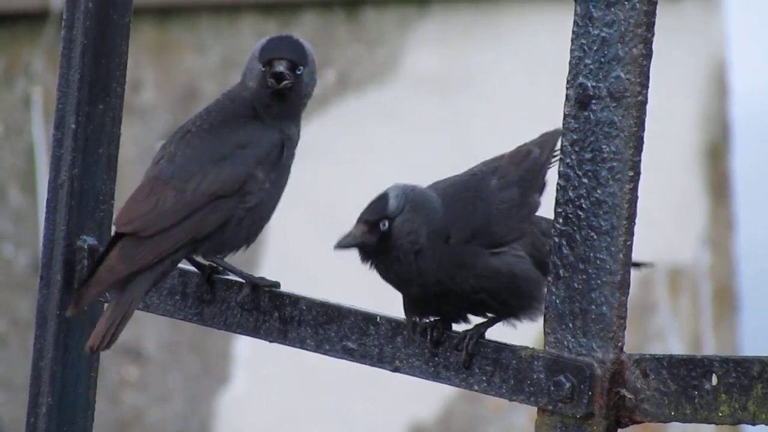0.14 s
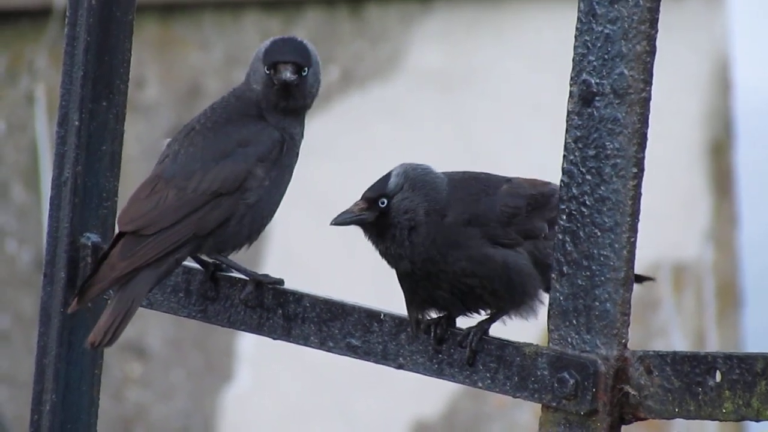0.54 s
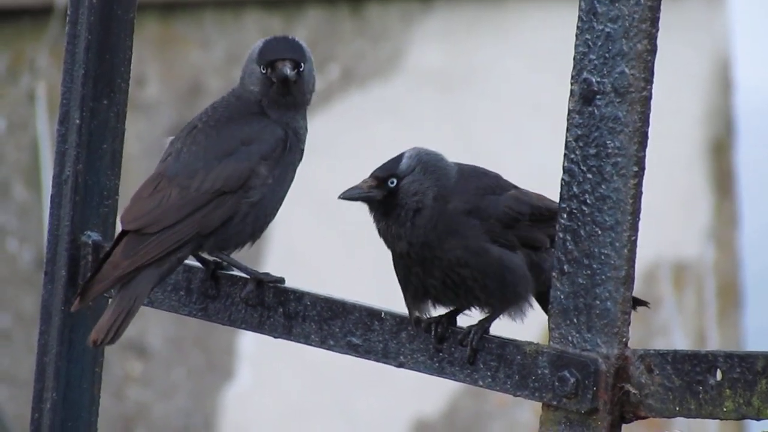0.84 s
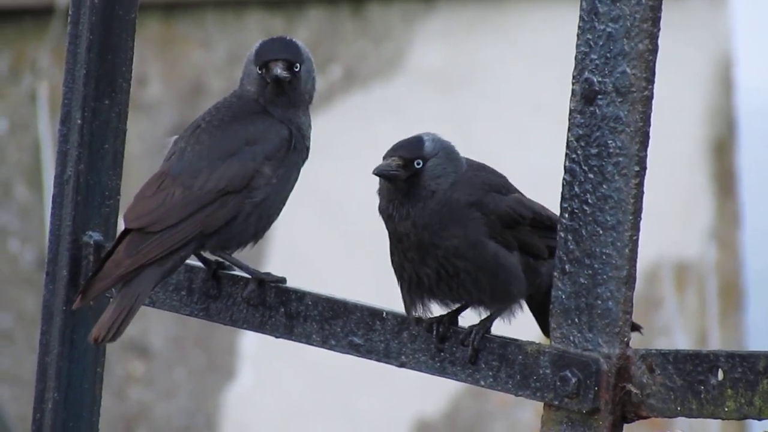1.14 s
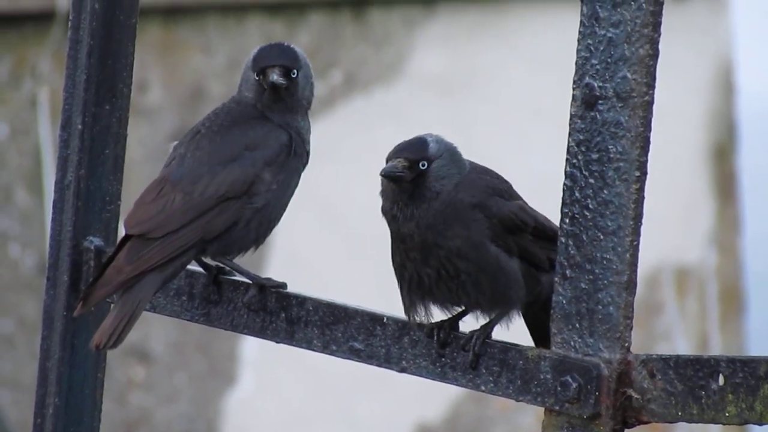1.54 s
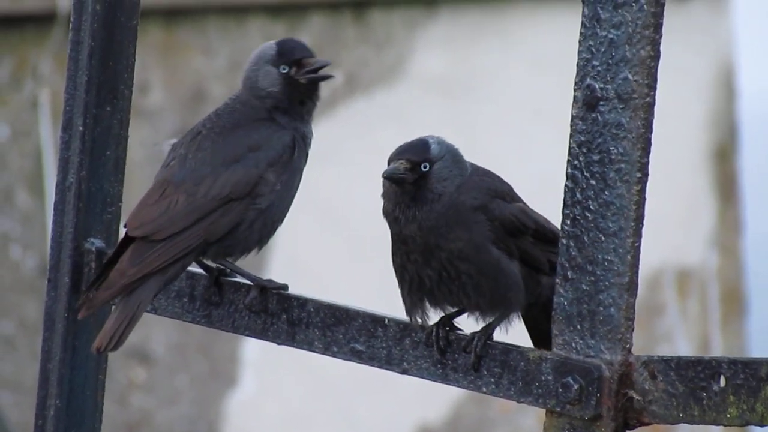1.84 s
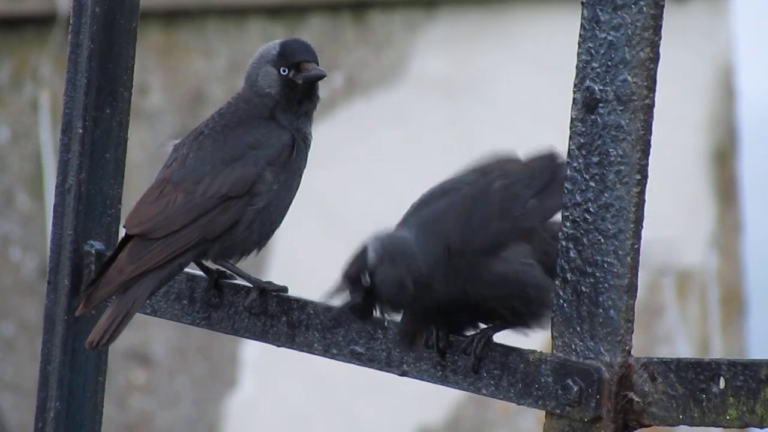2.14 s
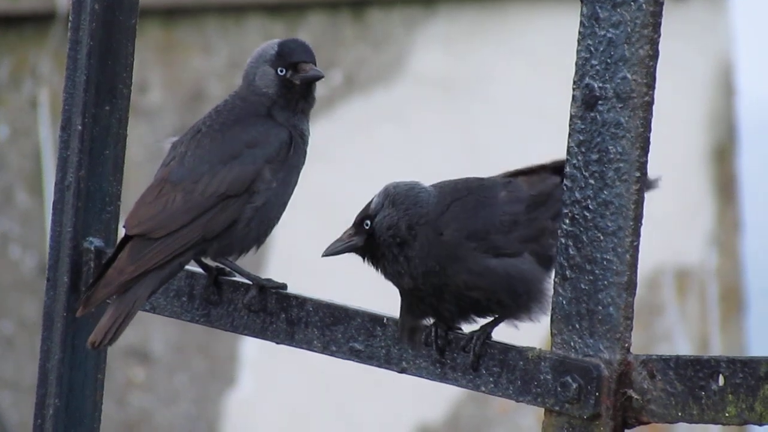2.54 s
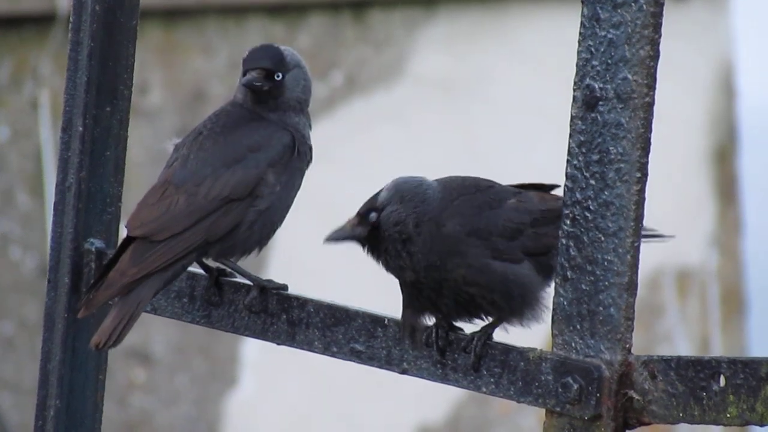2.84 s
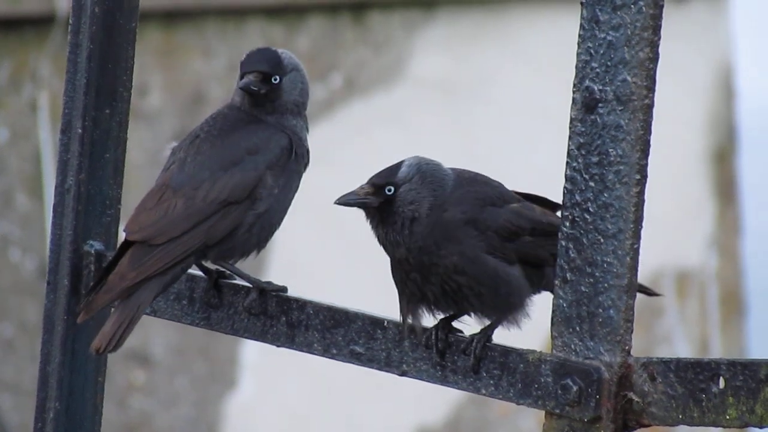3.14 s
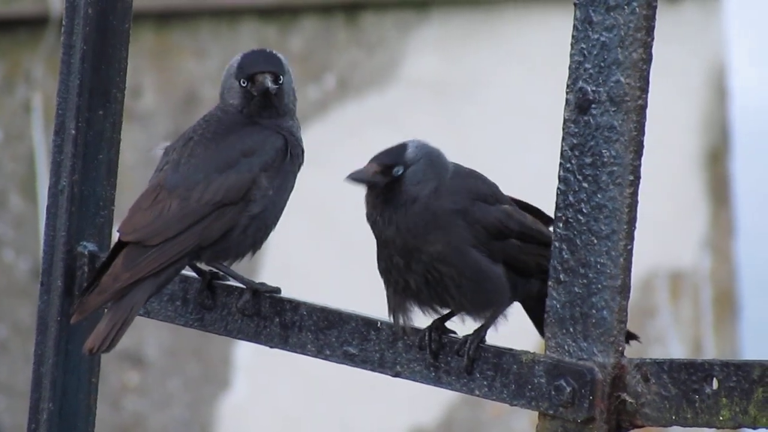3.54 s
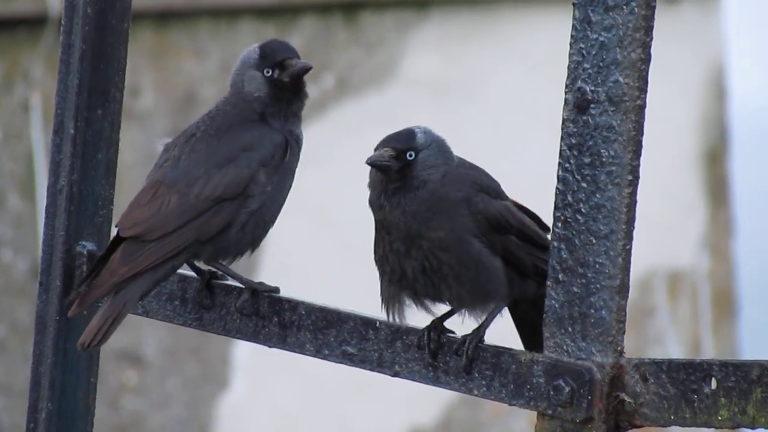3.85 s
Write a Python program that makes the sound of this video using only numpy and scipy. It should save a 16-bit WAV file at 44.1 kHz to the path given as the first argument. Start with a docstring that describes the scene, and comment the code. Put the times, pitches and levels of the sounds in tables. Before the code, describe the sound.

A close jackdaw is caught mid-chack at 0 s, then gives a harsh falling caw at 0.2 s. After a gap, a caw at 1.95 s is followed by a clear chack at 2.15; a final caw comes at 3.7. Walls return short echoes and a ringing tail. A faint gull yelps until 1.8, sparrows chirp between 0.5 and 3.3, a far jackdaw calls at 2.75. Low town noise; wind thumps the microphone, strongest at the start.

```python
"""Jackdaws among buildings: long falling caws and short clear chacks, as harmonic series through throat resonances.
Yard walls return them as discrete echoes and a decaying comb-filter tail; a third jackdaw calls far off.
A far gull yelps in frequency-modulated arches, sparrows chirp in gliding tones, and noise bands rasp and murmur.
Band-filtered noise makes the town and its hums; low-passed noise makes gusts thump the two microphone ports."""
import sys
import numpy as np
from scipy import signal
from scipy.fft import rfft, irfft, next_fast_len
from scipy.io import wavfile

SR = 44100
rng = np.random.default_rng(int(sys.argv[2]) if len(sys.argv) > 2 else 0)


def to_wav(s):
    """Save 16-bit WAV."""
    ch = np.atleast_2d(s).T  # columns
    pcm = np.round(np.clip(ch, -1, 1) * 32767)  # PCM
    wavfile.write(sys.argv[1], SR, pcm.astype(np.int16))


N = 176400
T = np.arange(N) / SR
PAD = next_fast_len(N + 2 * SR)
HZ = np.maximum(np.arange(PAD // 2 + 1) * SR / PAD, 1)
CUTOFF_HZ = 15800   # no jackdaw harmonic sounds above this


def amp(db):
    """Level to amplitude: 20 dB is a factor of ten."""
    return 10 ** (np.asarray(db) / 20)


def rms_one(x):
    """Normalisation to unit root-mean-square."""
    return x / np.sqrt(np.mean(x ** 2) + 1e-20)


def at_hz(points, hz):
    """Linear interpolation on a logarithmic frequency axis."""
    f, v = np.transpose(points)
    return np.interp(np.log(hz), np.log(np.maximum(f, 1)), v)


def drift(rate, size=N):
    """Slow random modulation of unit rms: white noise through a double real pole at `rate` Hz."""
    r = np.exp(-2 * np.pi * rate / SR)
    noise = rng.standard_normal(size + SR // 2)
    settled = signal.lfilter([1], [1, -2 * r, r * r], noise)[SR // 2:]
    return rms_one(settled)


def shaped(x, gain):
    """Linear filtering: the spectrum is multiplied by a frequency response."""
    return irfft(rfft(x, PAD) * gain, PAD)[..., :N]


def bump(start, length, rise):
    """Sine-squared envelope that peaks at the fraction `rise` of its span."""
    u = (T - start) / length
    ramp = np.clip(np.minimum(u / rise, (1 - u) / (1 - rise)), 0, 1)
    return np.sin(np.pi / 2 * ramp) ** 2


def sine_phase(hz):
    """Phase is the time integral of frequency."""
    return 2 * np.pi * np.cumsum(hz) / SR


JITTER = .002                # rms share of pitch
PHASE_SCATTER_RAD = 3.5      # range of starting phases
FLUTTER_DB = 3.2             # each harmonic wavers on its own; in full from the fifth up
BEAK_DB, BEAK_WIDTH_HZ = 8, 250   # lift of the strongest harmonic
NOTCH_HZ, NOTCH_WIDTH_HZ, NOTCH_DB = 3580, 290, -16   # side branch of the throat
FIFTH_DB = -7                # fifth harmonic before the break
BREAK_ROUGH, BREAK_ROUGH_S = .25, .015   # extra roughness at the break, and its decay time
LATE_FOURTH_DB, LATE_AFTER_S = 6, .035   # the fourth harmonic grows as the pitch sags


def rough_harmonic(k, phase, rough):
    """Narrow-band modulation: part of a harmonic's steady carrier power goes to noise sidebands."""
    size = len(phase)
    smooth = signal.butter(2, 220, fs=SR, output="sos")
    shake = signal.sosfilt(smooth, rng.standard_normal((2, size + 500)))[:, 500:]
    shake = shake / shake.std()
    share = np.clip(rough * (.2 + k / 5), 0, .95)   # higher harmonics are noisier
    envelope = np.sqrt(1 - share) + np.sqrt(share / 2) * (shake[0] + 1j * shake[1])
    wave = envelope * np.exp(1j * (k * phase + rng.uniform(0, PHASE_SCATTER_RAD)))
    flutter_db = FLUTTER_DB * min(k / 5, 1) * (drift(25, size=size) - .2)
    return (wave * amp(flutter_db)).imag


def jackdaw_call(rows, throat, rough_start, rough_end, break_s, third_db, fourth_db):
    """Source-filter voice: a jittered harmonic series, rougher late on, weighted by the throat's resonances."""
    s, *columns = np.transpose(rows)
    i = np.arange(int(s[0] * SR), int(s[-1] * SR))
    t = i / SR
    hz, db, treble_db = [np.interp(t, s, c) for c in columns]
    hz = hz * (1 + JITTER * drift(128, size=len(i)))
    phase = sine_phase(hz)

    broken = np.clip((t - break_s) / .006, 0, 1)   # 0 before the break, 1 after
    since = np.clip(t - break_s, 0, 1)
    rough = rough_start + (rough_end - rough_start) * np.linspace(0, 1, len(i)) ** 3
    rough = rough + BREAK_ROUGH * broken * np.exp(-since / BREAK_ROUGH_S)
    before_break_db = {3: third_db, 4: fourth_db, 5: FIFTH_DB}
    late_db = LATE_FOURTH_DB * np.clip(since / LATE_AFTER_S - 1, 0, 1)
    beak_hz = hz * (2 + broken)   # strongest harmonic: second, then third

    parts, powers = np.zeros((2, len(i))), np.zeros((2, len(i)))   # low band, high band
    for k in range(1, 45):
        harmonic_hz = k * hz
        gain_db = at_hz(throat, harmonic_hz)
        gain_db = gain_db + NOTCH_DB * np.exp(-((harmonic_hz - NOTCH_HZ) / NOTCH_WIDTH_HZ) ** 2)
        gain_db = gain_db + BEAK_DB * np.exp(-((harmonic_hz - beak_hz) / BEAK_WIDTH_HZ) ** 2)
        gain_db = gain_db + before_break_db.get(k, 0) * (1 - broken) + (k == 4) * late_db
        gain = amp(gain_db) * (harmonic_hz < CUTOFF_HZ)
        high = np.clip((harmonic_hz - 3600) / 800, 0, 1)   # crossover around 4 kHz
        bands = np.array([1 - high, high])
        parts += gain * rough_harmonic(k, phase, rough) * bands
        powers += gain ** 2 / 2 * bands ** 2

    # each band is brought to its share of the power
    top = np.clip(amp(treble_db) ** 2, 0, .95)
    voice = np.sum(parts * np.sqrt([1 - top, top] / powers), axis=0)
    attack = np.clip((t - s[0]) / .0015 + (s[0] == 0), 0, 1)   # a call at time zero starts at once
    release = np.clip((s[-1] - t) / .008, 0, 1)
    out = np.zeros(N)
    out[i] = amp(db) * attack * release * voice
    return out


# long falling calls, one table each: [t/s, pitch f/Hz, level/dB, treble above about 4 kHz re level/dB]
CAW_CONTOURS = [
    [(0.218, 583, -45, -12), (0.227, 720, -28, -5), (0.236, 728.6, -19, -5.5), (0.25, 725.4, -15.5, -6),
     (0.256, 697.7, -14, -5), (0.28, 556.7, -21, -1), (0.302, 503, -23.5, -5.5), (0.334, 453.5, -25, -7),
     (0.364, 396, -31, -2), (0.376, 393, -30, -4), (0.4, 364, -47, -11)],
    [(1.939, 587, -30, -11), (1.947, 712, -26, 10), (1.951, 771, -21.5, -3), (1.966, 760.5, -16.5, -4),
     (1.971, 762, -15, -0.5), (1.989, 621.4, -16, -2), (2.019, 498.5, -22.5, -2), (2.063, 434.7, -27, -4.5),
     (2.087, 420.6, -25, -3.5), (2.11, 435, -48, -19)],
    [(3.706, 487, -37, -23), (3.712, 642, -34, -8), (3.718, 812.5, -23, -5), (3.735, 756, -18.5, -1),
     (3.74, 752.6, -14, -2), (3.76, 569, -17.5, -2.5), (3.78, 506.7, -20.5, -2), (3.8, 458.4, -26, -6.5),
     (3.824, 437, -25.5, -0.5), (3.876, 325.6, -33.5, -6), (3.89, 315, -50, -16)],
]
# throat response in a caw: [f/Hz, relative level/dB]
CAW_RESONANCES = [(290, -36), (500, -23.5), (863, -26), (1390, -2), (1890, 0), (2260, 3.5), (2650, -1),
                  (3080, -11.5), (3390, -3), (3640, 0), (4010, -7), (4680, -13), (5020, -6.5), (5310, 1),
                  (6190, 0), (7850, -7.5), (9160, -7), (9820, -5), (11000, -15.5), (12800, -12.5),
                  (14100, -43)]
# voice breaks, where the strongest harmonic jumps from second to third:
# [t/s, third harmonic before it level/dB, fourth harmonic before it level/dB]
CAW_BREAKS = [(.247, -2, 0), (1.968, -12, 7), (3.738, -10, 2)]


def caws():
    """Register break: the pitch falls and the strongest harmonic moves up one order."""
    return sum(jackdaw_call(rows, CAW_RESONANCES, .05, .3, *break_row)
               for rows, break_row in zip(CAW_CONTOURS, CAW_BREAKS))


# short clear calls, one table each: [t/s, pitch f/Hz, level/dB, treble above about 4 kHz re level/dB]
CHACK_CONTOURS = [
    [(0.0, 1080, -15, -5.5), (0.016, 930, -22, -12.5), (0.032, 826, -28, -5), (0.048, 710, -40, -24),
     (0.055, 670, -34, -17)],
    [(2.157, 1161, -20, -6.5), (2.175, 1097, -16, -5.5), (2.203, 855, -27, -5.5), (2.225, 700, -36, -27)],
]
# throat response in a chack: [f/Hz, relative level/dB]
CHACK_RESONANCES = [(350, -60), (600, -28), (928, -6), (1360, -11), (2250, 0), (3350, -10), (4910, -10.5),
                    (6560, -4), (7690, -8), (8550, -20), (10300, -9.5), (12900, -34), (14100, -44)]


def chacks():
    """Short harmonic calls of rapidly falling pitch, without a register break."""
    return sum(jackdaw_call(rows, CHACK_RESONANCES, .2, .45, np.inf, 0, 0) for rows in CHACK_CONTOURS)


# interaural-type differences between the ports: [f/Hz, left minus right level/dB]
PORT_LEVEL = [(60, -5), (91, -3), (140, -6), (210, -6), (320, 7), (480, -1.5), (740, -2), (1120, 0.5),
              (1700, 0.5), (2570, 4.5), (3910, 1.5), (5930, 5.5), (9010, -4.5), (13700, 5.5)]
# [f/Hz, phase by which the left leads/rad]
PORT_PHASE = [(0, 0), (2410, .3), (2760, -1), (3700, .5), (4310, -.6), (4650, .2), (6120, -.2), (7150, .3),
              (7580, 4.2), (8010, 4.2), (9220, 6.5), (13900, 6.2)]


def at_ports(x):
    """Stereo reception: level and phase differences, split evenly between the two ports."""
    sign = np.array([[.5], [-.5]])
    phase = np.interp(HZ, *np.transpose(PORT_PHASE))
    return shaped(x, amp(sign * at_hz(PORT_LEVEL, HZ)) * np.exp(1j * sign * phase))


# decay of the tail by 60 dB: [f/Hz, decay time t/s]
YARD_DECAY = [(500, 3), (1300, 0.28), (2250, 1.17), (2800, 2.6), (4000, 1.35), (6000, 0.74), (12000, 0.26)]
# near and far walls: [delay t/s, level/dB, low-pass f/Hz]
WALL_ECHOES = [(.012, -15, 12000), (.027, -18, 9000), (.21, -26, 2600)]
# a row of echoes in one band: [delay t/s]
RING_DELAYS = (.04, .07, .11, .14, .17, .2)
# crossfeed of the response between sides: [f/Hz, amplitude share added from the other side]
YARD_CROSSFEED = [(1000, 0.21), (3000, 0.43), (8000, 0.025)]
YARD_DB, YARD_TILT_DB = -28, -1.5   # tail gain at 2 kHz, tilt per octave
RING_HZ, RING_WIDTH_HZ, RING_DB = 3080, 300, -19


def yard(x):
    """Reverberation: discrete wall reflections, and sixteen parallel comb filters a side for the tail."""
    def delay(s):
        return np.exp(-2j * np.pi * HZ * s)

    t60 = at_hz(YARD_DECAY, HZ)
    ring_band = amp(RING_DB) / (1 + (2 * (HZ - RING_HZ) / RING_WIDTH_HZ) ** 4)
    tail_gain = amp(YARD_DB + YARD_TILT_DB * np.log2(HZ / 2000))
    sides = []
    for side in range(2):
        tail = 0
        for k, d in enumerate(rng.uniform(0.022, .09, 16)):
            loop_gain = amp(-60 * d / t60)
            tail = tail + (-1) ** k * delay(d) / (1 - loop_gain * delay(d))
        # walls reach the right side 0.71 ms later
        walls = sum(amp(db) * delay(s + 0.00071 * side) / (1 + (HZ / hz) ** 4) for s, db, hz in WALL_ECHOES)
        ring = ring_band * sum(delay(s * rng.uniform(.95, 1.05)) for s in RING_DELAYS)
        sides.append(tail_gain * tail + walls + ring)
    sides = np.array(sides)
    return shaped(x, sides + np.clip(at_hz(YARD_CROSSFEED, HZ), 0, 1) * sides[::-1])


# far gull: [start t/s, top pitch f/Hz, relative level/dB]
GULL_YELPS = [(-.05, 1384, -29.5), (0.218, 1386, -34), (.495, 1395, -33), (0.764, 1407, -36.5),
              (1.04, 1388, -37.5), (1.325, 1390, -37), (1.64, 1363, -37)]
YELP_S, YELP_TOP_AT = .135, .4   # length, and the share of it where pitch peaks
YELP_RISE_BEND, YELP_FALL_BEND = .8, .42   # curvature of the pitch arch
YELP_DIP_DB, YELP_OVERTONE_DB = -9, -18


def gull():
    """Frequency modulation: arched tones with a second harmonic, weak at the top and loudest on the way down."""
    out = 0
    for s, top_hz, db in GULL_YELPS:
        u = (T - s) / YELP_S
        bend = np.where(u < YELP_TOP_AT, YELP_RISE_BEND, YELP_FALL_BEND)
        phase = sine_phase(top_hz * (1 - bend * np.clip(u - YELP_TOP_AT, -1, 1) ** 2))
        early = bump(s, 0.41 * YELP_S, rise=0.17) + .4 * bump(s, 0.7 * YELP_S, rise=0.7)
        late = bump(s + 0.46 * YELP_S, 0.56 * YELP_S, rise=0.75) ** .6
        swell = amp(YELP_DIP_DB) * early + late
        over = amp(YELP_OVERTONE_DB) * bump(s, YELP_S, rise=0.42) ** .5 * amp(5 * drift(50))
        out = out + amp(db) * (swell * np.sin(phase) + over * np.sin(2 * phase))
    return out * amp(2.0 * drift(38))


# sparrows: [start t/s, length t/s, start f/Hz, middle f/Hz, end f/Hz, relative level/dB]
SPARROW_CHIRPS = [(.545, 0.079, 4950, 4800, 4500, -52), (.59, 0.047, 4700, 5230, 5130, -50),
                  (0.702, 0.016, 4400, 4610, 4680, -51), (2.835, 0.037, 4250, 4200, 4200, -62),
                  (1.235, 0.051, 4400, 5310, 4500, -51), (1.357, 0.035, 4180, 4760, 5200, -55),
                  (2.478, 0.047, 4700, 5360, 4670, -49), (2.556, 0.11, 5100, 5160, 5150, -60),
                  (2.716, 0.042, 4000, 4140, 4200, -53), (2.927, 0.047, 4250, 4170, 4120, -57),
                  (2.983, 0.044, 4000, 4040, 4000, -52), (3.133, 0.05, 4800, 5180, 4270, -48.5),
                  (3.17, 0.022, 5200, 5000, 5050, -54), (3.222, .035, 5250, 5200, 5100, -58),
                  (3.262, 0.042, 5200, 5160, 5250, -59.5), (3.247, .03, 4330, 4380, 4260, -58)]
CHIRP_BLUR_HZ = 42   # rms wander of the pitch


def sparrows():
    """Gliding pure tones: frequency follows a parabola through three points, blurred by random modulation."""
    out = 0
    for s, length, hz0, hz1, hz2, db in SPARROW_CHIRPS:
        parabola = np.polyfit([0, .5, 1], [hz0, hz1, hz2], 2)
        hz = np.polyval(parabola, np.clip((T - s) / length, 0, 1))
        tone = np.sin(sine_phase(hz + CHIRP_BLUR_HZ * drift(117.0)))
        out = out + amp(db) * bump(s, length, rise=0.31) ** .5 * tone
    return out * amp(4 * drift(90))


# a third jackdaw far off: start t/s, length t/s, start f/Hz, end f/Hz
FAR_CALL = (2.757, .07, 1480, 1370)
# its first four harmonics: relative level/dB
FAR_HARMONICS = [-46.5, -54, -56, -53]


def far_jackdaw():
    """Harmonic synthesis: four partials of a falling pitch, the higher ones more sharply peaked in time."""
    s, length, hz0, hz1 = FAR_CALL
    phase = sine_phase(np.interp(T, [s, s + length], [hz0, hz1]))
    envelope = bump(s, length, rise=.15)
    return sum(amp(db) * envelope ** (k / 2) * np.sin(k * phase) for k, db in enumerate(FAR_HARMONICS, 1))


# a raspy twitter and the murmur of far gulls: [start t/s, length t/s, centre f/Hz, width f/Hz, relative level/dB]
RASP_BANDS = [(0.541, 0.25, 4670, 940, -53), (0.537, 0.24, 7800, 3800, -55), (0.14, 3.7, 2540, 410, -57),
              (0.11, 3, 1213, 390, -49.5)]


def rasp():
    """Band-pass filtering: one grainy, amplitude-modulated noise is heard through several bands."""
    grain = rng.standard_normal(N) * amp(2.0 * drift(30))
    out = 0
    for s, length, hz, width, db in RASP_BANDS:
        band = rms_one(shaped(grain, 1 / (1 + (2 * (HZ - hz) / width) ** 4)))
        out = out + amp(db) * bump(s, length, rise=0.11) * band
    return out


# spectral density of the town: [f/Hz, relative level per Hz/dB]
TOWN_SPECTRUM = [(15, -38), (25, -5), (70, -2), (102, -8), (193, -6.5), (220, -11), (251, 0.5), (336, -5),
                 (405, -3.5), (438, -8), (487, 1), (706, -6.5), (1560, -3), (2040, -10), (2460, -10.5),
                 (4760, -16), (5160, -17.5), (6050, -23.5), (14100, -31.5)]
# loudness contour, before a common lift of 1.5 dB: [t/s, level/dB]
TOWN_CONTOUR = [(0.0, -44), (0.9, -48), (1.06, -47.5), (2.34, -46.5), (2.64, -47), (4.0, -47)]
# likeness of left and right: [f/Hz, correlation from -1 to 1]
TOWN_CORRELATION = [(60, 0.88), (130, 0.88), (280, 0.91), (610, 0.92), (1340, 0.71), (2900, 0.056),
                    (6300, 0.19), (13700, -0.13)]
# [f/Hz, left minus right level/dB]
TOWN_SIDES = [(60, 5), (110, 2.5), (200, 3), (370, 1), (670, 0.5), (1220, 2.5), (2240, -3.5), (4090, 4.5),
              (7480, 2.5), (13700, 0.5)]
# wavering hums: [centre f/Hz, width f/Hz, mean level/dB]
HUMS = [(106.9, 20, -59), (342.2, 16, -62), (415.3, 4.4, -59)]
HUM_WAVER_DB = 2.5   # rms


def town():
    """Partially correlated stereo noise in 0.4-octave bands, lightly flickering, plus narrow-band hums."""
    edges = 22 * 2 ** np.arange(0, 9.7, .4)
    white = rng.standard_normal((2, 2, N))   # neighbouring bands use different noise
    sign = np.array([[1], [-1]])
    out = 0
    for k, (low, high) in enumerate(zip(edges, edges[1:])):
        band = signal.butter(2, [low, high], "band", fs=SR, output="sos")
        mid, side = signal.sosfilt(band, white[k % 2])
        hz = np.sqrt(low * high)
        alike = np.clip(at_hz(TOWN_CORRELATION, hz), -1, 1)
        flicker_db = 1.1 * drift(7.7)
        gain = amp(at_hz(TOWN_SPECTRUM, hz) + flicker_db + at_hz(TOWN_SIDES, hz) / 2 * sign)
        out = out + gain * (np.sqrt(1 + alike) * mid + np.sqrt(1 - alike) * side * sign)

    hums = 0
    for hz, width, db in HUMS:
        resonance = 1 / (1 + (2 * (HZ - hz) / width) ** 2)
        hum = rms_one(shaped(rng.standard_normal(N), resonance))
        hums = hums + amp(db + HUM_WAVER_DB * drift(0.71)) * hum
    level_db = np.interp(T, *np.transpose(TOWN_CONTOUR)) + 1.5
    return amp(level_db) * rms_one(out) + hums


# gusts at the left port: [start t/s, length t/s, relative level/dB]
LEFT_GUSTS = [(.04, 0.066, -36), (.3, 0.059, -56), (.5, 0.058, -42), (.7, 0.17, -51), (.92, 0.18, -41.5),
              (1.08, 0.16, -53), (1.32, 0.064, -56), (1.53, 0.18, -49), (1.72, 0.091, -69),
              (1.98, 0.11, -53), (2.13, 0.082, -35), (2.21, 0.037, -51.5)]
# gusts at the right port: [start t/s, length t/s, relative level/dB]
RIGHT_GUSTS = [(-.02, 0.039, -10), (.03, 0.063, -20.5), (.09, 0.096, -40), (.17, 0.079, -35),
               (.25, 0.13, -43), (.42, 0.075, -29.5), (.48, 0.055, -31.5), (.58, 0.12, -43),
               (.76, 0.067, -36.5), (.94, 0.084, -38.5), (.99, 0.075, -33.5), (1.08, 0.097, -25.5),
               (1.15, 0.13, -40), (1.3, 0.078, -46), (1.42, 0.096, -37), (1.49, 0.049, -39.5),
               (1.55, .1, -57), (1.71, 0.14, -44), (1.97, 0.046, -43), (2.09, 0.12, -31.5),
               (2.16, 0.25, -42.5)]
# steady breeze under the gusts: [t/s, relative level/dB]
BREEZE_LEVEL = [(0, -55), (1.2, -51.5), (2.2, -66), (2.3, -85), (4, -61)]
GUST_CUT_HZ, GUST_LOW_HZ, GUST_LUMP_DB = 133, 41.7, 0.5   # upper and lower corners, rms lumpiness


def wind(gusts):
    """Flow noise at one port: low-frequency noise under gust envelopes, independent of the other port."""
    low_pass = 1 / (1 + (HZ / GUST_CUT_HZ) ** 2.33)
    high_pass = 1 / (1 + (GUST_LOW_HZ / HZ) ** 3)
    noise = rms_one(shaped(rng.standard_normal(N), low_pass * high_pass))
    level = amp(np.interp(T, *np.transpose(BREEZE_LEVEL)))
    level = level + sum(amp(db) * bump(s, length, rise=0.17) for s, length, db in gusts)
    return level * amp(GUST_LUMP_DB * drift(27.6)) * noise


FAR_WET_DB = 3   # extra feed of the far birds to the yard


def scene():
    """Superposition: direct birds and their reverberation add to town noise and wind."""
    near = caws() + chacks()
    far = gull() + sparrows() + far_jackdaw() + rasp()
    direct = at_ports(near) + far * amp([[1], [-1]])   # far birds are 2 dB louder on the left
    reverberant = yard(near + amp(FAR_WET_DB) * far)
    gusts = np.array([wind(LEFT_GUSTS), wind(RIGHT_GUSTS)])
    return direct + reverberant + town() + gusts


def record(dry):
    """Band limiting: a steep low-pass reaches 70 dB of attenuation 400 Hz above the cutoff."""
    low_pass = signal.cheby2(12, 70, CUTOFF_HZ + 400, fs=SR, output="sos")
    return signal.sosfilt(low_pass, dry)


dry = scene()
out = record(dry)
to_wav(out)
```